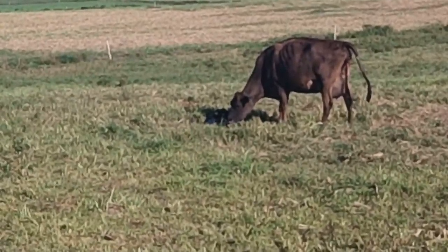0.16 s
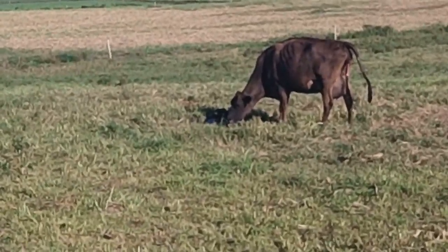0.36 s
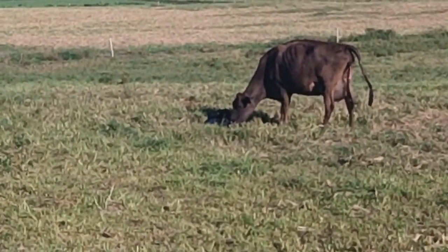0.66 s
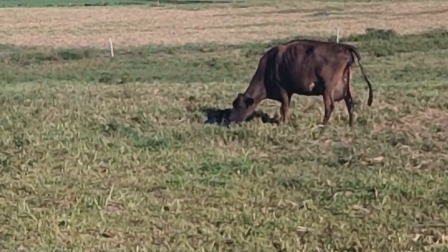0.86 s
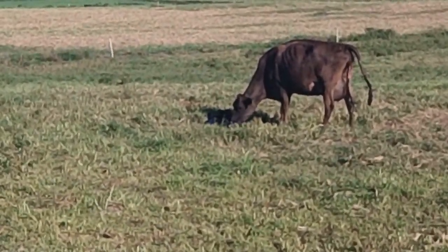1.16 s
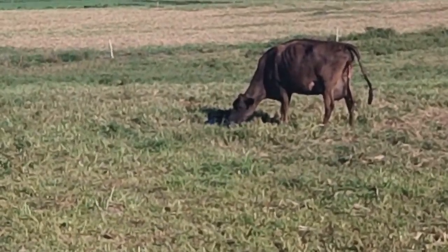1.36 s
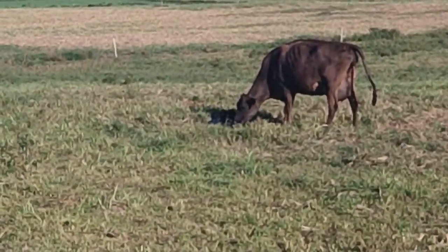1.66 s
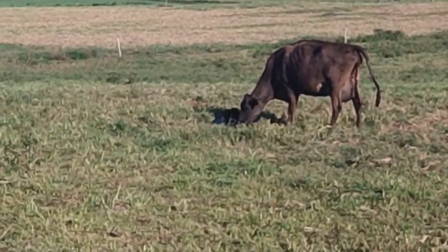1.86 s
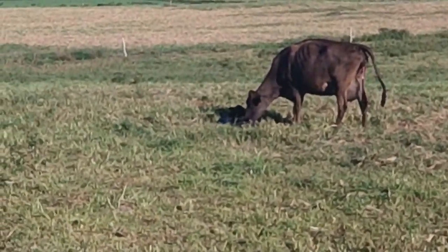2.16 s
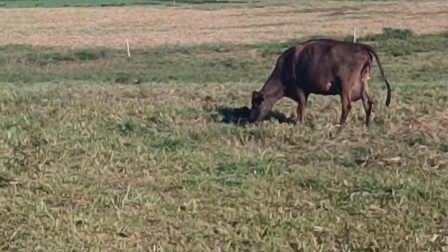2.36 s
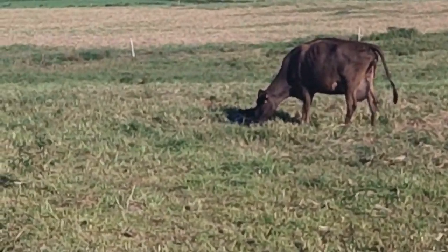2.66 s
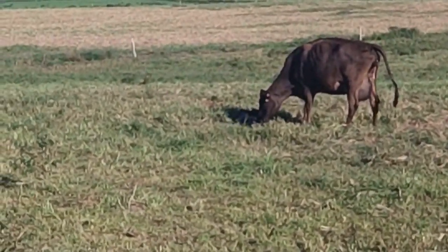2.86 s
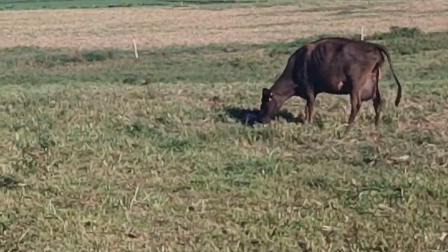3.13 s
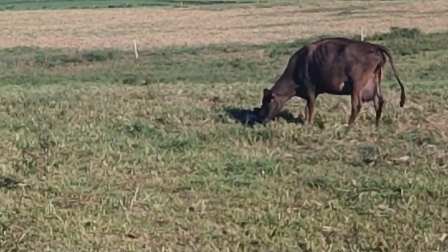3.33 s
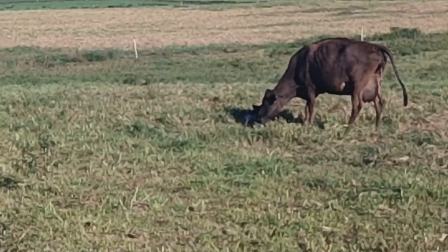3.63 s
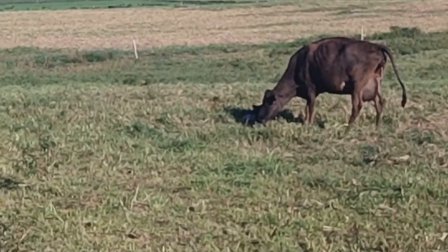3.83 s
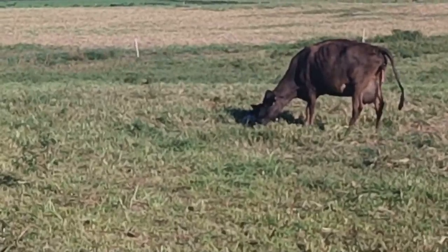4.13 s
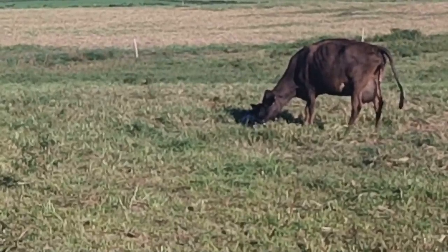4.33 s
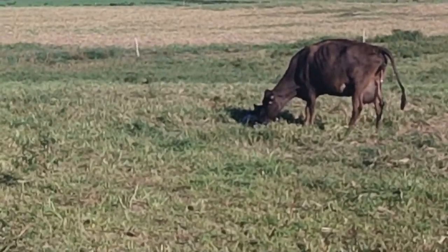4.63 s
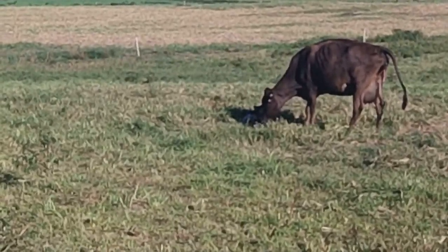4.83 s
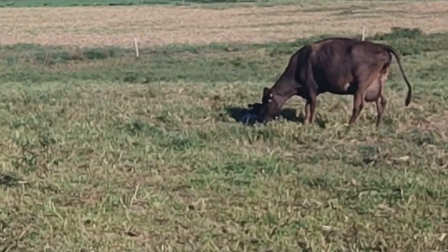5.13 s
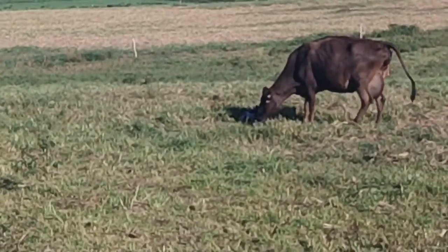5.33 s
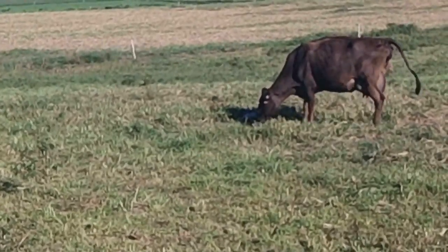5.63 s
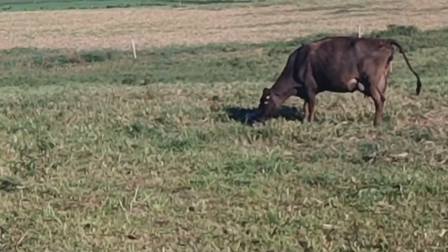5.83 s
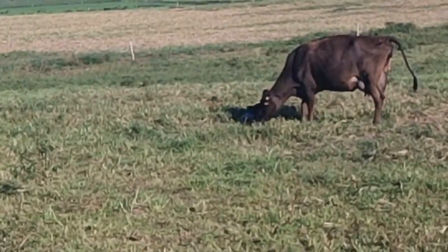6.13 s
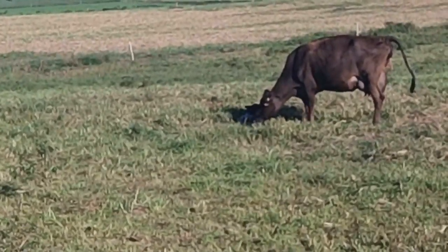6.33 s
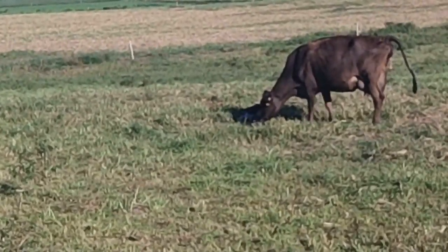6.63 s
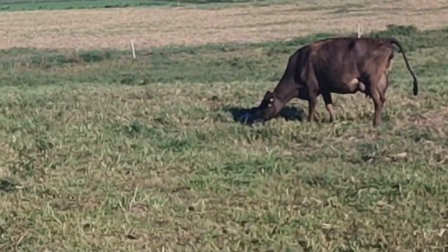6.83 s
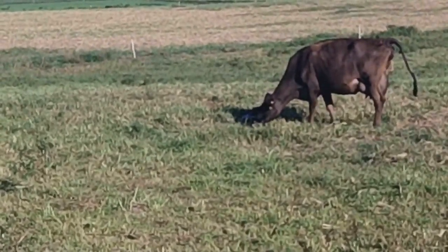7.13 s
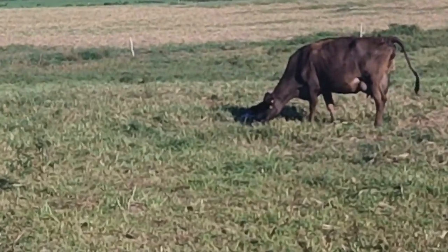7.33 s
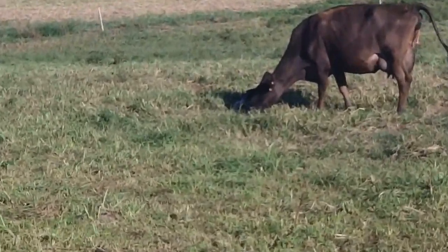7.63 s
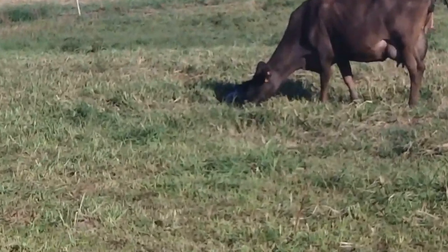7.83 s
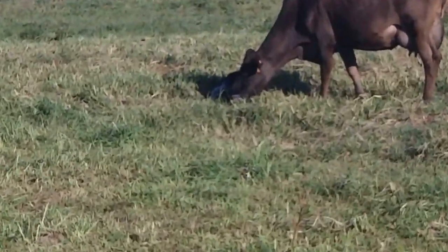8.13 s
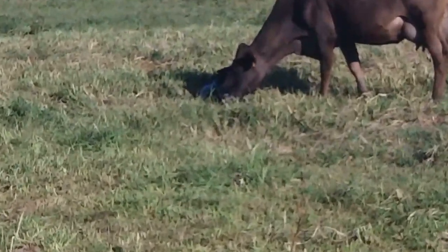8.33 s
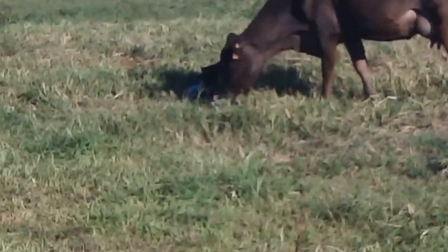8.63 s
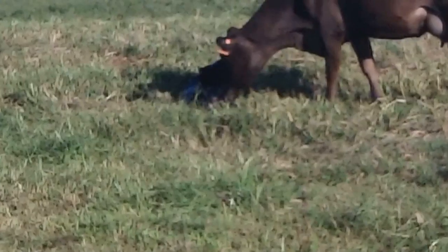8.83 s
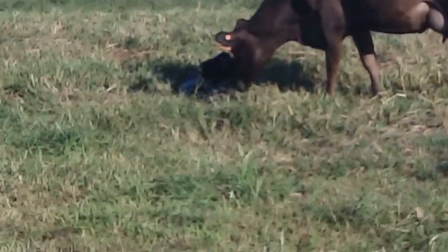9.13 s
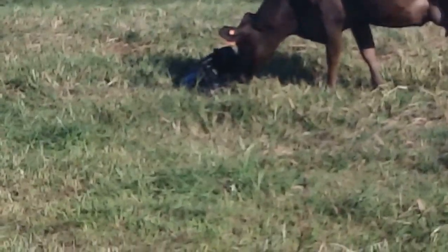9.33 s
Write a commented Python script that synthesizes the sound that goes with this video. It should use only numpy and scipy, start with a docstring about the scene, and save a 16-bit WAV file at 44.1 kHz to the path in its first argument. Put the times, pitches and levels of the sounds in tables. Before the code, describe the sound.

Outdoor single-channel sound with no room echo: bright cricket chirps, quick shrill trills and a soft high insect shimmer over light breeze and faint hiss. The distant road noise creeps up for several seconds, then swells fast into a broad tyre roar with a low humming engine. The first car passes at nearly eight seconds, its pitch sinking; two further cars whoosh by within two seconds, so the end stays full of road noise.

```python
"""Cars pass one after another on a country road beside a pasture: filtered noises for tyres, body and air swell
by distance and sink by Doppler shift. A drone of engine harmonics follows the first car; a knock precedes it.
In the grass crickets chirp and trill in short gliding tones, and a katydid lisps in ticking tone bursts.
Far choruses are narrow noise bands; two thin calls, a light breeze and faint hisses lie behind them."""
import sys
import numpy as np
from scipy import signal
from scipy.fft import rfft, irfft, next_fast_len
from scipy.io import wavfile
from scipy.ndimage import map_coordinates

SR = 44100
rng = np.random.default_rng(int(sys.argv[2]) if len(sys.argv) > 2 else 0)


def to_wav(s):
    """Save 16-bit WAV."""
    ch = np.atleast_2d(s).T  # columns
    pcm = np.round(np.clip(ch, -1, 1) * 32767)  # PCM
    wavfile.write(sys.argv[1], SR, pcm.astype(np.int16))


N = 418068
T = np.arange(N) / SR
FFT_SIZE = next_fast_len(N, True)
FREQS = np.arange(FFT_SIZE // 2 + 1) * SR / FFT_SIZE

# Levels in the tables are those before any gain curve, random scatter or common offset in the functions.
# cars: (passing time [s], then levels [dB] of tread roar, road roar, tyre hiss, body rumble, spray, deep rumble)
CARS = [(7.69, -25, -30.5, -37.5, -30.5, -56, -35), (8.86, -26.5, -27, -32, -44.5, -38.5, -43.5),
        (9.68, -28, -28, -35, -33, -42, -33)]
# spectra of the road sounds: (frequency [Hz], relative density [dB])
TREAD_SPECTRUM = [(450, -40), (750, -9.5), (950, 0.5), (1300, 0.5), (1650, -1.5), (2000, -8.5), (2600, -18),
                  (4000, -47)]
ROAD_SPECTRUM = [(230, -42), (370, -9), (510, -2), (720, 1.5), (850, 2.5), (1050, -5.5), (1500, -20)]
HISS_SPECTRUM = [(1300, -16.5), (2000, 5.5), (2500, 3.5), (3200, 0), (3900, -7.5), (4800, -19.5),
                 (6500, -26), (9000, -89)]
BODY_SPECTRUM = [(80, -13.5), (125, -2), (190, 3), (290, -1), (370, -9.5), (520, -11.5), (900, -62)]
SPRAY_SPECTRUM = [(2000, -18), (3300, 12.5), (4000, 13.5), (4800, 8.5), (6000, 0), (7200, -57), (8000, -79),
                  (12000, -16)]
DEEP_SPECTRUM = [(10, 0), (25, -3.5), (45, -4), (70, 0.5), (110, -1.5), (150, -6.5), (230, -24), (600, -60)]
# swell of each road sound: (lead of its peak [s], half-length [s], fall with distance [dB per decade])
TREAD_SPREAD = (0.15, 0.71, 29.8)
ROAD_SPREAD = (-0.26, 0.89, 38)
HISS_SPREAD = (0.6, 0.67, 35.9)
BODY_SPREAD = (0.016, 0.49, 25.5)
SPRAY_SPREAD = (0.39, 0.34, 19.7)
DEEP_SPREAD = (-.02, 0.49, 20.2)
DOPPLER_SHIFT = .055  # share by which pitch is raised coming and lowered going
# moving air carries the tyre noise now better, now worse: (time [s], level [dB])
CARRY = [(0, 2), (.45, -8.5), (1.6, -6), (1.9, 0.5), (2.55, 1.5), (3.1, 0), (3.75, 1.5), (4.3, 2.5), (5, 1),
         (5.35, 2.6), (6.25, -1), (6.8, -0.3), (7.15, 0.7), (7.38, -1), (7.6, -1.2), (7.85, 0.3),
         (8.4, 0.6)]
# level of the tyre hiss alone: (time [s], level [dB])
HISS_LEVEL = [(0, -5), (3.2, 3), (5.2, -1), (6.15, -3.5), (6.6, 1), (7.05, -1), (7.4, 4), (7.65, -0.5),
              (8.2, 0), (8.52, 1), (9.48, 1.5)]
# engine speed of the first car, before Doppler shift: (time [s], firing rate [Hz])
REVS = [(0, 87.8), (6.5, 87.8), (6.9, 91.3), (7.55, 95), (7.75, 92), (7.86, 89.5), (7.93, 92), (8.08, 90.5),
        (8.35, 91.5), (9.48, 90)]
# engine orders: (multiple, level coming [dB], level going [dB], flare time [s], flare length [s], flare [dB])
ENGINE_ORDERS = [(1, -14, -11, 7.7, .2, 2), (2, -2.5, 0, 7.96, .13, 6.5), (3, -3, -13, 7.81, .085, 8.5),
                 (4, -12, -22, 7.61, .06, 8)]
ENGINE_DB, ENGINE_SPREAD = -32.5, (0, .5, 22)  # base level; swell in the columns of the road sounds
# after the car's passing time: middle and half-length of the pitch drop [s], takeover by the exhaust [s]
ENGINE_LAG_S, ENGINE_SINK_S, EXHAUST_LAG_S = .08, .09, .22
ENGINE_LOSS_DB_PER_S = 2.3  # the field soaks up the drone of a distant car
KNOCK_S = 6.8975
# dull swells of low sound: (time [s], length [s], pitch [Hz], width [Hz], level [dB])
BUMPS = [(1.112, 0.015, 406, 120, -51), (1.714, 0.018, 129, 89, -39), (7.645, 0.2, 370, 160, -29.5),
         (9.1, .12, 350, 150, -37), (9.48, 0.11, 370, 150, -32)]
# level of all field sounds, dipping briefly under the first car: (time [s], level [dB])
FIELD_LEVEL = [(0, -2), (7.35, -2), (7.65, -10.5), (8.0, -5.5), (8.35, -3), (9.48, -4.5)]
# chirps of the nearest cricket: (first flick [s], strokes, level [dB], extra level of the held notes [dB])
CHIRPS = [(0.275, 4, -34, -2.5), (1.422, 4, -36, -3.5), (2.097, 4, -36.5, 1), (2.789, 4, -40, 10),
          (3.502, 4, -36.5, 4.5), (4.431, 5, -34.5, 1.5), (5.56, 5, -33, -1.5), (6.514, 4, -33.5, -1),
          (7.13, 5, -39, 2)]
# strokes of one chirp: (time of closing flick [s], held note length [s], held note level [dB], flick level [dB])
CHIRP_STROKES = [(0, .006, -14, -6.5), (.036, .012, -13, -4), (.08, .019, -4, -3), (.127, .024, -.5, -3),
                 (.179, .026, 0, -3.5)]
# pitch of the held note [Hz]; length [s], top pitch [Hz] and fall [share] of the flick
NOTE_HZ, FLICK_S, FLICK_HZ, FLICK_DROOP = 4210, .009, 4010, .1
# phrases of the second cricket: (start [s], strokes, spacing [s], pitch [Hz], level over PHRASE_DB [dB])
PHRASES = [(.125, 5, .046, 4340, 2), (.48, 7, .053, 4330, 0), (.95, 8, .052, 4320, -.5),
           (1.62, 5, .055, 4330, -.5), (1.95, 7, .056, 4350, 0), (2.625, 7, .049, 4350, 1.5),
           (3.14, 5, .048, 4340, 1.5), (3.675, 6, .055, 4360, 2.5), (4.15, 5, .055, 4350, -.5),
           (4.68, 3, .055, 4340, 1.5), (5.04, 5, .052, 4320, 2), (5.4, 3, .055, 4350, 0),
           (5.76, 4, .052, 4380, .5), (6.03, 8, .053, 4340, 1.5)]
PHRASE_DB = -46.3
# bouts of the ground cricket:
# (start [s], runs, run period [s], strokes per run, stroke rate [per s], mid pitch [Hz], level [dB])
TRILL = [(.03, 5, .094, 6, 75, 5280, -49.3), (.51, 1, 1.5, 72, 63, 5190, -51.6),
         (1.667, 3, .066, 4, 75, 5240, -51.5), (1.865, 1, .23, 17, 75, 5270, -50),
         (2.108, 2, .08, 5, 77, 5280, -50), (2.272, 5, .098, 6, 73, 5290, -49),
         (2.765, 6, .109, 7, 73, 5290, -48.5), (3.417, 7, .096, 6, 75, 5310, -48),
         (4.088, 15, .1037, 7, 77, 5320, -47.8), (5.645, 9, .0995, 6, 72, 5320, -48.3),
         (6.535, 31, .0955, 6, 76, 5320, -49)]
# pitches of the far crickets: (share that sing lower, pitch [Hz])
FAR_PITCHES = [(0, 3600), (.17, 3700), (.2, 4150), (.55, 4350), (1, 4500)]
# lisps of the katydid: (time [s], level [dB])
LISPS = [(.03, -65), (.35, -61), (.66, -58), (1.02, -60), (1.34, -59), (1.65, -58), (2.03, -57),
         (2.33, -59), (2.61, -59), (2.85, -56), (3.12, -57), (3.4, -60), (3.71, -55), (4.0, -56),
         (4.34, -60), (4.63, -60), (4.94, -56), (5.23, -59), (5.54, -57), (5.85, -57), (6.23, -61),
         (6.52, -57), (6.76, -58), (7.049, -58), (7.37, -60), (7.67, -55), (8.12, -63), (8.43, -57),
         (8.7, -62.5), (9.04, -68), (9.3, -58)]
# far insect choruses: (pitch [Hz], width [Hz], level [dB], mean pulse rate [per s])
CHORUSES = [(3520, 220, -57, 56), (4210, 310, -54, 10), (6830, 436, -50.5, 74), (8810, 330, -63.5, 93)]
# very high, thin hiss band that comes and goes: (time [s], level [dB])
HIGH_HISS = [(0.0, -68), (2.21, -69), (3.67, -55), (6.57, -63.5), (6.94, -66), (7.68, -105), (8.61, -63),
             (8.87, -69), (9.48, -49)]
# faint far-off calls: (time [s], length [s], mean pitch [Hz], level [dB])
FAR_CALLS = [(.01, 0.022, 1325, -44), (0.28, 0.034, 1320, -47)]
# gusts of the breeze: (time [s], level [dB])
GUSTS = [(0, -47), (.45, -48), (1.2, -49), (1.35, -53.5), (1.7, -45.5), (2.15, -51), (3.1, -46.5),
         (4.2, -52), (4.8, -59), (5.3, -45), (6.3, -70)]
# spectrum of the faint background hiss, with a narrow gap at 8 kHz: (frequency [Hz], relative density [dB])
BACKGROUND_SPECTRUM = [(100, -23), (450, 6), (1800, 3.5), (3000, 2.5), (4800, -0.5), (5900, -5.5),
                       (7300, -12), (8000, -41), (10000, -7.5), (12000, -13), (15000, -26)]
TOP_HZ = 15300  # upper limit of the recorder


def undb(db):
    """Logarithmic level: decibels to amplitude gain."""
    return 10 ** (np.asarray(db) / 20)


def unit(x):
    """Normalization to an rms of 1."""
    return x / np.sqrt(np.mean(x ** 2) + 1e-18)


def curves(table):
    """Linear interpolation: each column of a time table, one value a sample."""
    s, *columns = np.transpose(table)
    return [np.interp(T, s, column) for column in columns]


def shaped(gain):
    """Spectral filtering: noise of rms 1 with a given gain at each frequency."""
    spectrum = rfft(rng.standard_normal(FFT_SIZE)) * gain
    return unit(irfft(spectrum, FFT_SIZE)[:N])


def walk(rate):
    """Low-pass noise: a smooth random curve of rms 1 that changes about rate times a second."""
    return shaped(np.exp(-(FREQS / rate) ** 2))


def noise(spectrum):
    """Colored noise of rms 1, its level interpolated along log frequency."""
    hz, db = np.transpose(spectrum)
    return shaped(undb(np.interp(np.log(FREQS + 1), np.log(hz), db, right=-120)))


def turn(hz):
    """Phase as the integral of frequency, in radians."""
    return 2 * np.pi * np.cumsum(hz * np.ones(N)) / SR


def band(hz, width_hz):
    """Quadrature modulation: two random envelopes make a noise band of rms 1, as of many unrelated voices."""
    in_phase = walk(width_hz * 1.19) * np.cos(turn(hz))
    quadrature = walk(width_hz * 1.58) * np.sin(turn(hz))
    return unit(in_phase + quadrature)


def swell(s, length):
    """Gaussian envelope around time s."""
    return np.exp(-((T - s) / length) ** 2)


def add(out, s, sound):
    """Superposition: mix a sound in from time s."""
    i = int(np.clip(s * SR, 0, N))
    out[i:i + len(sound)] += sound[:N - i]


def passing(s, spread):
    """Distance law: gain of a source on a straight path that passes at time s."""
    early, width, fall = spread
    distance = np.hypot(1, (T - s + early) / width)
    return undb(-fall * np.log10(distance))


def pitch_shift(s, width):
    """Doppler factor: high on approach, sinking through 1 at time s."""
    return 1 - DOPPLER_SHIFT * (T - s) / np.hypot(T - s, width)


def doppler(x, speed):
    """Time compression: play a sound faster or slower along a curve."""
    return map_coordinates(x, [np.cumsum(speed)], order=3, mode="mirror")


def wheel_throb(depth_db=1.05, hz=11.1):
    """Periodic modulation: the rumble pulses once for each turn of the wheels, in dB."""
    return depth_db * np.sin(turn(hz * (1 + 0.036 * walk(2.4))))


def traffic(flutter_db=0.95, grit_db=1.0, sink_s=.3):
    """Rolling noise: tread blocks roar, the body rumbles and squeezed air hisses, all Doppler shifted."""
    carry, = curves(CARRY)
    hiss, = curves(HISS_LEVEL)
    grit = grit_db * walk(110)  # coarse asphalt roughens the treble
    throb = wheel_throb()
    times, *columns = np.transpose(CARS)
    layers = [(TREAD_SPECTRUM, TREAD_SPREAD, carry),
              (ROAD_SPECTRUM, ROAD_SPREAD, carry / 2),
              (HISS_SPECTRUM, HISS_SPREAD, grit + carry + hiss),
              (BODY_SPECTRUM, BODY_SPREAD, throb),
              (SPRAY_SPECTRUM, SPRAY_SPREAD, grit),
              (DEEP_SPECTRUM, DEEP_SPREAD, throb)]
    out = np.zeros(N)
    for (spectrum, spread, waver_db), levels in zip(layers, columns):
        cars = np.zeros(N)
        for s, db in zip(times, levels):
            moving = doppler(noise(spectrum), pitch_shift(s, sink_s))
            cars += moving * undb(db) * passing(s, spread)
        out += cars * undb(waver_db + flutter_db * walk(27))
    return out


def tyre_horn(hz=1620, width_hz=300, level_db=-27, early_s=0.32, length=.2):
    """Horn effect: the wedge of tyre and road beams a brighter roar ahead, just before the first car is level."""
    return band(hz, width_hz) * undb(level_db) * swell(CARS[0][0] - early_s, length)


def engine(waver_db=0.9):
    """Harmonic series: firing orders sink as the first car passes; the lower exhaust note takes over behind it."""
    s = CARS[0][0]
    revs, = curves(REVS)
    shift = pitch_shift(s + ENGINE_LAG_S, ENGINE_SINK_S)
    phase = turn(revs * shift * (1 + .002 * walk(12)))
    behind = .5 + .5 * np.tanh((T - s - EXHAUST_LAG_S) / .05)
    drone = np.zeros(N)
    for multiple, coming, going, at, length, flare in ENGINE_ORDERS:
        level = coming + (going - coming) * behind + flare * swell(at, length)
        drone += np.sin(multiple * phase) * undb(level + waver_db * walk(22))
    return drone * undb(ENGINE_DB - ENGINE_LOSS_DB_PER_S * abs(T - s)) * passing(s, ENGINE_SPREAD)


def knock(thud_hz=160, thud_width_hz=120, thud_db=-24.0, thud_s=0.027, attack_s=0.00072):
    """Impact decay: a knock of the nearing car, perhaps on a road seam, as a brief crack and a longer thud."""
    crack_hz, crack_db, crack_s = 1450, -4.5, .0012
    age = np.maximum(T - KNOCK_S, 0)
    thud = band(thud_hz, thud_width_hz) * undb(thud_db) * np.exp(-age / thud_s)
    crack = np.sin(2 * np.pi * crack_hz * age) * undb(crack_db) * np.exp(-age / crack_s)
    return (thud + crack) * (1 - np.exp(-(age / attack_s) ** 2))


def bumps():
    """Gated band noise: short, dull swells of low sound; the longest comes as the first car draws level."""
    return sum(band(hz, width) * undb(db) * swell(s, length) for s, length, hz, width, db in BUMPS)


def far_road(hz=1500, width_hz=480, level_db=-52.0, waver_db=1.0, rise_db=4, rise_s=1.4):
    """Band noise: thin tyre hiss from far down the road, slowly coming into earshot."""
    rise = -rise_db * np.maximum(1 - T / rise_s, 0)
    return band(hz, width_hz) * undb(level_db + rise + waver_db * walk(1.4))


def stroke(length, hz, droop):
    """Stridulation: the scraper runs along the wing file, one soft note that sags toward its end."""
    u = np.linspace(0, 1, int(length * SR))
    phase = 2 * np.pi * np.cumsum(hz * (1 - droop * u ** 2)) / SR
    return np.sqrt(2) * np.sin(np.pi * u) * np.sin(phase)


def near_cricket(note_droop=0.024, scatter_db=2.6):
    """Wing resonance: strokes hold a note, longer from stroke to stroke, and end in a quick falling flick."""
    out = np.zeros(N)
    chances = scatter_db * rng.standard_normal((len(CHIRPS), len(CHIRP_STROKES), 2))
    for (s, strokes, db, note_db), chance in zip(CHIRPS, chances):
        for (late, held, held_db, flick_db), (a, b) in zip(CHIRP_STROKES[:int(strokes)], chance):
            flick_start = s + late - FLICK_S / 2
            note = stroke(held, NOTE_HZ, note_droop)
            flick = stroke(FLICK_S, FLICK_HZ, FLICK_DROOP)
            add(out, flick_start - held, undb(db + note_db + held_db + a) * note)
            add(out, flick_start, undb(db + flick_db + b) * flick)
    return out


def neighbour_cricket(length=0.0302, droop=0.057, scatter_db=0.5, count=9):
    """Stridulation: a second field cricket, further off, sings longer phrases of even, sagging strokes."""
    out = np.zeros(N)
    chances = rng.standard_normal((len(PHRASES), count, 2))
    for (s, strokes, spacing, hz, db), chance in zip(PHRASES, chances):
        for k, (size, detune) in enumerate(chance[:int(strokes)]):
            note = stroke(length, hz * (1 + 0.006 * detune), droop)
            add(out, s + k * spacing, undb(db + PHRASE_DB + scatter_db * size) * note)
    return out


def ground_cricket(trim_db=0.5, scatter_db=1.1):
    """Frequency sweeps: runs of quick falling strokes with short gaps; early on, one long unbroken trill."""
    length, sweep_hz, jitter_s, jitter_hz = .0135, 860, .0008, 35
    u = np.linspace(0, 1, int(length * SR))
    envelope = np.sqrt(2) * np.sin(np.pi * u) ** 2
    out = np.zeros(N)
    for start, runs, period, strokes, rate, hz, db in TRILL:
        run_starts = start + period * np.arange(int(runs))[:, None]
        times = (run_starts + np.arange(int(strokes)) / rate).ravel()
        for s, (size, late, detune) in zip(times, rng.standard_normal((len(times), 3))):
            pitch = hz + jitter_hz * detune + sweep_hz * (.5 - u)
            tone = np.sin(2 * np.pi * np.cumsum(pitch) / SR)
            add(out, s + jitter_s * late, undb(db + trim_db + scatter_db * size) * envelope * tone)
    return out


def far_crickets(level_db=-51.5, length=0.0256, droop=0.122, scatter_db=2, spacing=0.038, count=110, size=3):
    """Random superposition: short chirps of other crickets, each at its own pitch, overlap from all over."""
    out = np.zeros(N)
    starts = np.linspace(-.1, T[-1], count)
    for s, (late, share, *sizes) in zip(starts, rng.random((count, 2 + size))):
        note = stroke(length, np.interp(share, *np.transpose(FAR_PITCHES)), droop)
        for k, strength in enumerate(sizes):
            level = level_db + scatter_db * (2 * strength - 0.5)
            add(out, s + .1 * late + k * spacing, undb(level) * note)
    return out


def grassy(sound, scatter_db=-11, decay_s=0.016):
    """Diffuse scattering: grass and ground leave a brief decaying blur behind a call."""
    age = T[:SR // 10]
    tail = rng.standard_normal(len(age)) * np.exp(-age / decay_s)
    blur = signal.fftconvolve(sound, tail / np.linalg.norm(tail))[:N]
    return sound + undb(scatter_db) * blur


def katydid(hz=8870, wander_hz=130, tick_hz=86, length=0.038, tick_depth=0.76,
            second_hz=8650, second_width_hz=220, second_db=-70, second_rate=6):
    """Amplitude modulation: lisps of fast ticks, about three a second; a fainter, quicker katydid behind them."""
    lisps = sum(undb(db) * swell(s, length) for s, db in LISPS)
    ticks = 1 + tick_depth * np.sin(turn(tick_hz * (1 + 0.02 * walk(6.1))))
    tone = np.sqrt(2) * np.sin(turn(hz + wander_hz * walk(251)))
    pulses = 1 + np.sin(turn(second_rate * (1 + 0.196 * walk(2.0))))
    second = band(second_hz, second_width_hz) * undb(second_db) * pulses
    return tone * lisps * ticks + second


def choruses(throb=0.16, shimmer_db=1):
    """Incoherent addition: distant insects merge into narrow throbbing bands."""
    out = np.zeros(N)
    for hz, width, db, rate in CHORUSES:
        pulses = 1 + throb * np.sin(turn(rate * (1 + 0.069 * walk(10.8))))
        out += band(hz, width) * undb(db + shimmer_db * walk(13)) * pulses
    return out


def far_calls(waver=0.017):
    """Frequency modulation: two thin, wavering notes, perhaps a bird across the field."""
    out = np.zeros(N)
    for s, length, hz, db in FAR_CALLS:
        tone = np.sin(turn(hz * (1 + waver * walk(67))))
        out += tone * undb(db) * swell(s, length)
    return out


def breeze(buffet_db=1.3):
    """Turbulence: deep, unsteady rumble of air as modulated low noise."""
    gust, = curves(GUSTS)
    return noise(DEEP_SPECTRUM) * undb(gust + buffet_db * walk(11))


def high_hiss(hz=14600, width_hz=1500, trim_db=-1, flicker_db=3):
    """Modulated band noise: an unsteady, very high, thin hiss that comes and goes."""
    level, = curves(HIGH_HISS)
    return band(hz, width_hz) * undb(level + trim_db + flicker_db * walk(30))


def background_hiss(level_db=-52.0, flicker_db=2.4):
    """Broadband noise: a faint hiss that flickers a little."""
    return undb(level_db + flicker_db * walk(25)) * noise(BACKGROUND_SPECTRUM)


def scene():
    """Superposition: road, insects, breeze and faint hisses add into one channel."""
    road = traffic() + tyre_horn() + engine() + knock() + bumps() + far_road()
    crickets = grassy(near_cricket() + neighbour_cricket() + ground_cricket() + far_crickets())
    field = crickets + katydid() + choruses() + far_calls() + high_hiss() + background_hiss()
    field_db, = curves(FIELD_LEVEL)
    return (road + undb(field_db) * field + breeze())[None]


def record(dry):
    """Low-pass filtering: the recorder cuts the top with a steep elliptic filter."""
    low_pass = signal.ellip(12, .1, 90, TOP_HZ, fs=SR, output="sos")
    return signal.sosfilt(low_pass, dry)


dry = scene()
out = record(dry)
to_wav(out)
```